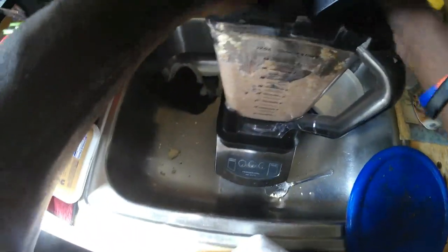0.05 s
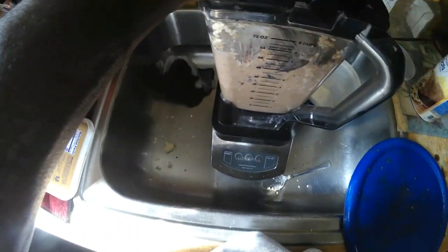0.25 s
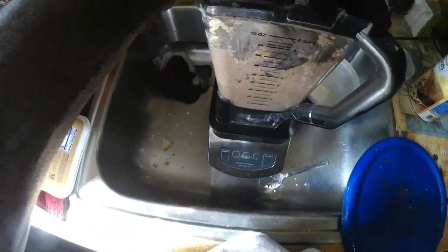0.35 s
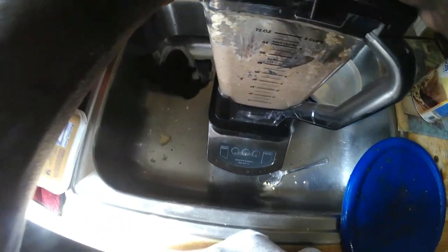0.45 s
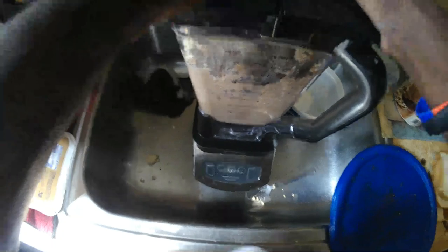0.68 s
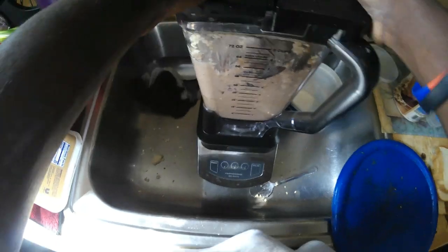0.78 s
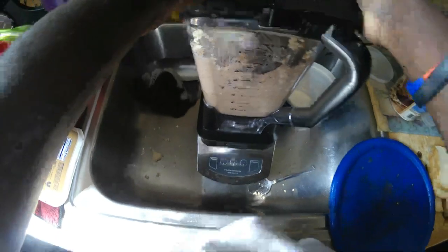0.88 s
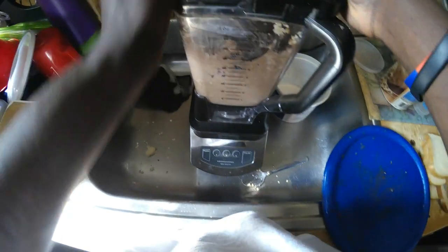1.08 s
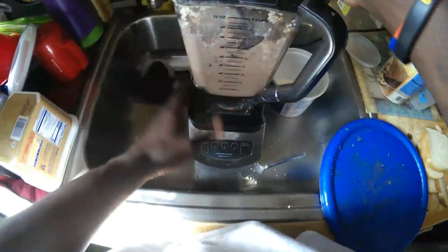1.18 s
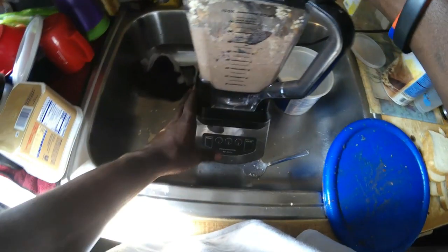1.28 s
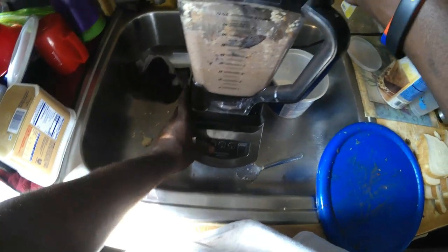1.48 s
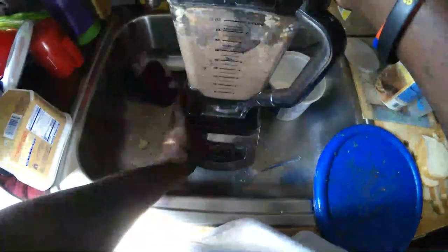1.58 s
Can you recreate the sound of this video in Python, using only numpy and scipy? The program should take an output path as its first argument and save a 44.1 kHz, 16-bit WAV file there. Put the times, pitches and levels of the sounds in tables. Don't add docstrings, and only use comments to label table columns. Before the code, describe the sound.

A plastic blender lid latch snaps twice in quick succession, rattling the hollow jug, then light finger taps, ticks and soft rubbing follow over low rumble in a quiet kitchen, heard close up.

```python
import sys
import numpy as np
from scipy import signal
from scipy.fft import rfft, irfft, next_fast_len
from scipy.io import wavfile
from scipy.ndimage import map_coordinates

SR = 44100
rng = np.random.default_rng(int(sys.argv[2]) if len(sys.argv) > 2 else 0)


def invert_db(level):
    return 10 ** (np.asarray(level, dtype=float) / 20)


def generate_wav(signal):
    frames = np.transpose(np.atleast_2d(signal))
    scaled = np.clip(frames, -1, 1) * 32767
    pcm = np.round(scaled).astype(np.int16)
    wavfile.write(sys.argv[1], SR, pcm)


N = 72765


def unit(x):
    return x / np.sqrt(np.mean(x ** 2) + 1e-20)


def along(points, hz):
    f, v = np.transpose(points)
    return np.interp(np.log(hz + 1), np.log(f + 1), v)


def curves(rows):
    s, *cols = np.transpose(rows)
    return [np.interp(np.arange(N) / SR, s, c) for c in cols]


def wobble(rate_hz):
    knots = rng.standard_normal(int(N * rate_hz / SR) + 4)
    return map_coordinates(knots, [np.arange(N) * rate_hz / SR])


def noise(response, size):
    m = next_fast_len(size + 4096)
    spectrum = rfft(rng.standard_normal(m)) * response(np.fft.rfftfreq(m, 1 / SR))
    return unit(irfft(spectrum, m)[:size])


def peaks(table):
    def response(f):
        power = sum(invert_db(2 * db) / (1 + ((f * f - c * c) / (f * w + 1e-9)) ** 2) for c, w, db in table)
        return np.sqrt(power)
    return response


def hump(hz, spread_oct):
    return lambda f: np.exp(-(np.log2((f + 1) / hz) / spread_oct) ** 2 / 2)


def rise(t, rise_s):
    return 1 - np.exp(-t / rise_s)


def fade(t, db, t60_s):
    return invert_db(db - 60 * t / t60_s)


def add(out, s, x):
    i = max(round(s * SR), 0)
    out[i:i + len(x)] += x[:N - i]


def snap(hits, modes, colour, crack_db, crack_s):
    longest_s, blur_db, scatter_db = .045, 2.5, 1.5
    out, t = np.zeros(N), np.arange(SR // 4) / SR
    for s, db, tilt_db in hits:
        lean = lambda hz: tilt_db * np.log2((hz + 1) / 2000)
        ring = np.zeros(len(t))
        for hz, level, t60 in modes:
            mode_db = level + lean(hz) + rng.normal(0, scatter_db) + blur_db * wobble(200)[:len(t)]
            ring += fade(t, mode_db, min(t60, longest_s)) * np.sin(2 * np.pi * hz * t)
        burst = noise(lambda f: invert_db(along(colour, f) + lean(f)), size=len(t))
        crack = fade(t, crack_db, crack_s) * burst
        add(out, s, invert_db(db) * (ring + crack) * rise(t, .0003))
    return out


def latch():
    # (time [s], level [dB], tilt [dB per octave])
    hits = [
        (.2372, -41.5, -1),
        (.2387, -15.5, 2),
        (.2403, -21.5, 3.5),
        (.2432, -24, -2),
        (.2465, -19, -5.5),
        (.251, -25, -2.5),
    ]
    # (frequency [Hz], level [dB], t60 [s])
    modes = [(824, -20.5, 0.03), (593.4, -22, 0.038), (1186, -2, 0.015), (1430, -6, 0.04),
             (1627, -12, .035), (3205, -12, 0.03), (3445, -12.5, 0.021), (3953, 5, 0.01), (4110, -5, 0.011),
             (4598, -9.5, 0.036), (5464, -5.5, 0.021), (6470, -16, 0.023), (9150, -16.5, 0.018)]
    # (frequency [Hz], level [dB])
    colour = [(200, -18.5), (800, -3.5), (2000, -1.5), (4000, 5.5), (7500, -11), (10000, -9), (15500, -35)]
    return snap(hits, modes, colour, crack_db=-2, crack_s=.03)


def lid():
    # (time [s], level [dB], tilt [dB per octave])
    hits = [
        (.3322, -27, -5),
        (.3338, -33.5, 6),
        (.3353, -17.5, 1),
        (.3372, -22, 1),
        (.3412, -21.5, 0.5),
        (.3445, -29, -2.5),
    ]
    # (frequency [Hz], level [dB], t60 [s])
    modes = [(365, -25.5, 0.05), (966, -14.5, 0.044), (1107, -8.5, 0.053), (1219, -5, 0.05),
             (1366, -5, 0.053), (1663, 0.5, 0.11), (1780, -15.5, 0.05), (2010, -12.5, 0.04),
             (2700, -15, 0.036), (3360, -5, 0.029), (3436, 4, 0.05), (3790, -3, 0.022), (4460, -8.5, 0.04),
             (5370, -22.5, .03)]
    # (frequency [Hz], level [dB])
    colour = [(200, 4.5), (800, -1.5), (1800, 5.5), (3500, -16), (6000, -19.5), (10000, -29),
              (15500, -41.5)]
    return snap(hits, modes, colour, crack_db=6.5, crack_s=.03)


def jug_wall():
    # (time [s], level [dB], frequency [Hz], t60 [s])
    body = [
        (.2425, -12.5, 836, .07),
        (.2405, -18.5, 598, 0.061),
        (.2385, -22, 384, 0.076),
        (.3372, -9, 1885, 0.052),
        (.3352, -25, 795, .05),
        (.332, -19, 360, .06),
        (.333, -22.5, 200, .07),
        (.334, -29, 560, .05),
        (.349, -29, 500, .08),
    ]
    out, t = np.zeros(N), np.arange(SR // 4) / SR
    for s, db, hz, t60 in body:
        add(out, s, fade(t, db, t60) * rise(t, .0027) * np.sin(2 * np.pi * hz * t))
    return out


def jug_rattle():
    # (time [s], level [dB], t60 [s])
    rattles = [
        (.241, -29, 0.24),
        (.338, -30.5, 0.33),
    ]
    # (frequency [Hz], width [Hz], level [dB])
    shells = [
        [(800, 820, 0.5), (1970, 2200, -7), (4200, 2000, -6), (9700, 1800, -11.5)],
        [(599, 1100, 0), (1836, 540, 1), (3324, 450, -3.5), (6200, 900, -20.5)],
    ]
    out, t = np.zeros(N), np.arange(SR // 2) / SR
    for (s, db, t60), shell in zip(rattles, shells):
        grain_db = 1.5 * wobble(110)[:len(t)]
        tail = noise(lambda f: peaks(shell)(f) ** 2, size=len(t))
        add(out, s, fade(t, db + grain_db, t60) * rise(t, .0046) * tail)
    return out


def sway():
    # (time [s], frequency [Hz], level [dB], t60 [s])
    swings = [
        (.249, 44, -23, 1.2),
        (.249, 100, -32, .4),
        (.337, 21, -12, .6),
        (.350, 43, -19, .45),
        (.346, 78, -24, .3),
    ]
    stop_s = .335
    out, t = np.zeros(N), np.arange(SR) / SR
    for s, hz, db, t60 in swings:
        stop = np.exp(-np.maximum(t + s - stop_s, 0) / 0.015) if s < stop_s else 1
        add(out, s, stop * fade(t, db, t60) * np.sin(2 * np.pi * hz * t) * rise(t, .006))
    return out


def strokes(spans, bands, grain_hz, skew, power):
    out, t = np.zeros(N), np.arange(SR // 4) / SR
    for (s, length), (db, hz, spread) in zip(spans, bands):
        swell = np.abs(np.sin(np.pi * np.clip(t / length, 0, 1) ** skew)) ** power
        grain = invert_db(db + 2.5 * wobble(grain_hz)[:len(t)])
        add(out, s, grain * swell * noise(hump(hz, spread), size=len(t)))
    return out


def finger_taps():
    # (time [s], level [dB], centre [Hz], spread [octaves], t60 [s])
    taps = [(.0368, -47.5, 1580, 0.36, 0.018), (.4643, -42.5, 1400, 0.91, 0.09),
            (.5467, -64, 4500, 0.59, 0.08), (.615, -54, 4600, 0.63, 0.078), (.618, -52, 1874, 0.32, 0.053),
            (.7402, -44, 1350, 0.83, 0.053), (.342, -43, 4960, 0.67, .14),
            (.9955, -49.5, 1680, 0.31, 0.041), (.909, -54, 500, 1.5, 0.1),
            (1.1727, -47.5, 1400, 0.44, 0.014), (1.428, -56, 494, 0.17, 0.11), (.0, -64, 3050, 1.4, 0.087),
            (.048, -62, 3200, 0.17, 0.019), (0.3222, -25, 900, 1.43, 0.034),
            (0.4645, -57, 6000, 0.85, 0.037), (0.74, -57.5, 4580, 0.34, 0.05)]
    out, t = np.zeros(N), np.arange(SR // 4) / SR
    for s, db, hz, spread, t60 in taps:
        add(out, s, fade(t, db, t60) * rise(t, .00045) * noise(hump(hz, spread), size=len(t)))
    return out


def finger_slides():
    # (start [s], length [s])
    spans = [(.15, .08), (.755, .04), (.755, .04), (.695, .03), (1.0, .06), (1.005, .135), (.9, .03),
             (1.0, .15), (1.08, .14)]
    # (level [dB], centre [Hz], spread [octaves])
    bands = [
        (-71, 3900, 0.51),
        (-67, 3800, 0.42),
        (-69.5, 8000, 0.46),
        (-72, 3600, 0.43),
        (-73, 10000, 0.19),
        (-70, 3200, 0.66),
        (-75, 3200, 0.37),
        (-61, 1360, 0.46),
        (-52.5, 520, 0.32),
    ]
    return strokes(spans, bands, grain_hz=127, skew=.45, power=.37)


def lid_ticks():
    # (time [s], level [dB], ring [Hz], t60 [s])
    ticks = [(0.266, -39, 1500, .012), (.2725, -32, 1790, .012), (.454, -56, 5600, .015),
             (0.466, -45, 3100, 0.036), (.470, -36, 800, .04), (.551, -50.5, 3460, 0.034),
             (.6018, -59, 4300, .015), (.6192, -34.5, 1843, 0.027), (0.641, -48, 1870, .02),
             (0.8057, -43, 1000, 0.019), (0.9953, -45.5, 1670, 0.016), (1.0464, -54, 1588, .02),
             (1.431, -43, 513, .05), (1.430, -66, 4200, .008)]
    out, t = np.zeros(N), np.arange(SR // 4) / SR
    for s, db, hz, t60 in ticks:
        spit = invert_db(-13) * noise(hump(hz, .5), size=len(t))
        ring = np.sin(2 * np.pi * hz * t) + spit
        add(out, s, fade(t, db, t60) * rise(t, .00079) * ring)
    return out


def palm_rubs():
    # (start [s], length [s])
    spans = [(1.2, .17), (.995, .04), (.36, .14), (.5, .15), (1.22, .15), (1.0, .13), (1.0, .05),
             (.36, .12), (.36, .1)]
    # (level [dB], centre [Hz], spread [octaves])
    bands = [
        (-59.5, 720, .4),
        (-71.5, 3100, 0.29),
        (-66.5, 4700, 0.43),
        (-69, 2800, 0.79),
        (-63.5, 1078, .12),
        (-73, 2400, .6),
        (-78, 9700, .1),
        (-52, 1880, .07),
        (-61.5, 3350, .06),
    ]
    return strokes(spans, bands, grain_hz=90, skew=.79, power=.6)


def basin():
    # (time [s], level [dB], brightness [dB])
    drag_start = [(0, -47, -0.5), (.1, -62.5, -15), (.17, -51, -5), (.22, -56, -4), (.3, -47, 0),
                  (.4, -47.5, -1), (.45, -46, -11)]
    drag = [(0.5, -47.5, -17), (0.572, -61, 12), (0.634, -48.5, 4.5), (0.708, -60.5, -16), (0.88, -62.5, 4),
            (0.912, -46, -13), (0.97, -76, 22), (0.998, -52.5, -3), (1.054, -61.5, 7), (1.086, -52.5, -8),
            (1.272, -48.5, 7), (1.37, -59.5, 12), (1.432, -52, -3), (1.65, -52.5, -2)]
    # (frequency [Hz], width [Hz], level [dB])
    low_modes = [(178.3, 15, -1), (191.8, 27, -10.5), (336.5, 24, -1), (388, 18, -0.5), (474, 21, -1.5),
                 (500, 9.2, -5), (670, 11, -9), (806, 42, -15)]
    high_modes = [(802.4, 51, 3), (1014, 22, 13.5), (1210.5, 180, -2.5), (1400, 420, -9),
                  (1898, 340, -13.5)]
    level_db, bright_db = curves(list(drag_start) + list(drag))
    dull = lambda f: 1 / (1 + (f / 2220) ** 4)
    low = invert_db(1.5 * wobble(40)) * noise(lambda f: peaks(low_modes)(f) * dull(f), size=N)
    high_db = -15 + bright_db + 1.5 * wobble(50)
    high = invert_db(high_db) * noise(lambda f: peaks(high_modes)(f) * dull(f), size=N)
    return invert_db(level_db + 3.5) * (low + high)


def kitchen(x):
    # (frequency [Hz], t60 [s])
    decay = [(200, 0.88), (2000, 0.26), (4000, 0.16), (10000, 0.075)]
    hz, t, z = signal.stft(rng.standard_normal(SR // 2), SR, nperseg=256)
    z = z * fade(t, 0, along(decay, hz)[:, None])
    tail = signal.istft(z, SR, nperseg=256)[1]
    delayed = np.pad(x, (200, 0))
    return signal.fftconvolve(delayed, tail / np.linalg.norm(tail))[:N]


def rumble():
    # (time [s], rumble [dB], boom share [dB])
    weight_start = [(0, -46, -10), (.09, -51.5, -3), (.14, -36.5, -0.5), (.22, -45, 5), (.4, -36.5, 9.5)]
    weight = [(0.5, -38, 3), (0.56, -43, 1), (0.62, -36, 3), (0.69, -44.5, -6), (0.76, -45.5, -10.5),
              (0.81, -35.5, 7.5), (0.842, -48, 10.5), (0.896, -42, -6.5), (1.018, -37, -11),
              (1.13, -50, 8.5), (1.146, -34.5, -12), (1.214, -49, -5), (1.254, -36, 7),
              (1.438, -45.5, -2.5), (1.496, -39, 5), (1.53, -43.5, -12), (1.65, -46, 11.5)]
    # (frequency [Hz], level [dB])
    colour = [(8, -13), (20, 3.5), (48, 3), (70, -3), (140, -13.5), (300, -31), (600, -67.5)]
    level_db, boom_db = curves(list(weight_start) + list(weight))
    low = noise(lambda f: invert_db(along(colour, f)), size=N)
    counter = peaks([(105.2, 32, 0)])
    boom = invert_db(-8 + boom_db + 1.5 * wobble(18)) * noise(lambda f: counter(f) ** 2, size=N)
    return invert_db(level_db) * (low + boom)


def air():
    # (frequency [Hz], level [dB])
    colour = [(100, -5), (400, -3.5), (1000, -17), (2400, -29), (5000, -38), (8000, -42.5), (12000, -42),
              (15500, -40.5)]
    # (frequency [Hz], width [Hz], level [dB])
    whine_band = [(11130, 130, 0)]
    tone = invert_db(-53) * noise(lambda f: invert_db(along(colour, f)), size=N)
    whine = invert_db(-87.5) * noise(lambda f: peaks(whine_band)(f) ** 2, size=N)
    return tone + whine


def scene():
    first, second = latch(), lid()
    touch = finger_taps() + finger_slides()
    wet = invert_db(-22) * (kitchen(first) + kitchen(second) + kitchen(touch))
    snaps = first + second + jug_wall() + jug_rattle() + sway()
    handling = touch + lid_ticks() + palm_rubs() + basin()
    return (snaps + handling + wet + rumble() + air())[None]


def top_cut(x):
    return signal.sosfilt(signal.butter(12, 16490, fs=SR, output="sos"), x)


def record(dry):
    edge = signal.cheby1(8, 1, 15550 / (SR / 2), output="sos")
    mix = signal.sosfilt(edge, dry)
    return top_cut(mix)


dry = scene()
out = record(dry)
generate_wav(out)
```